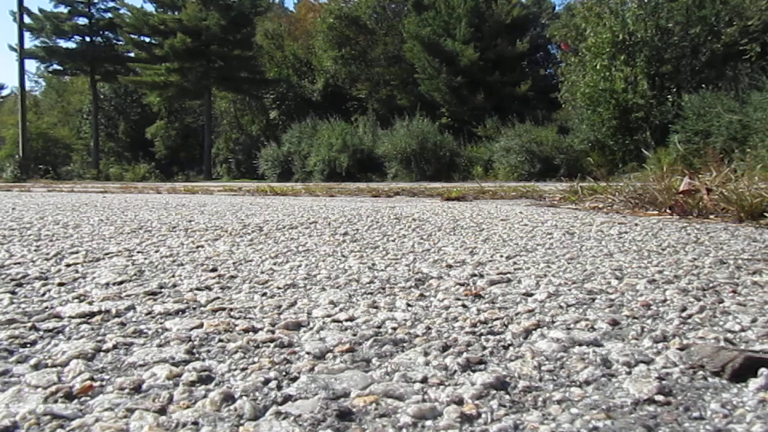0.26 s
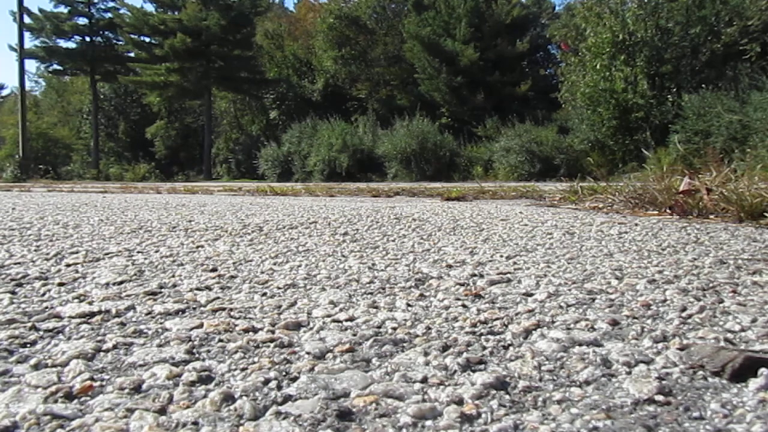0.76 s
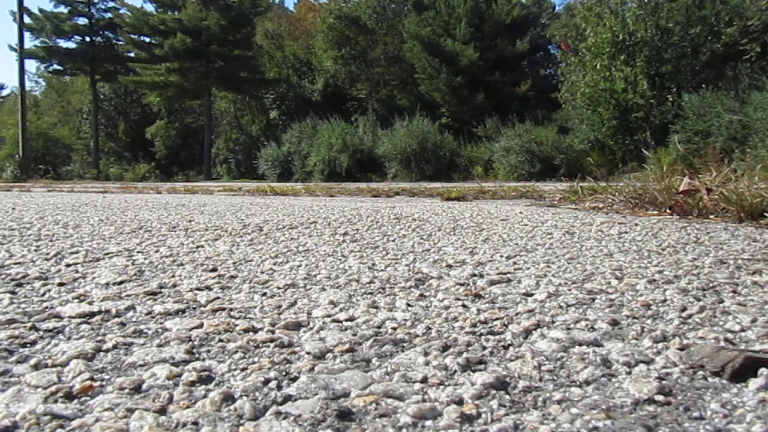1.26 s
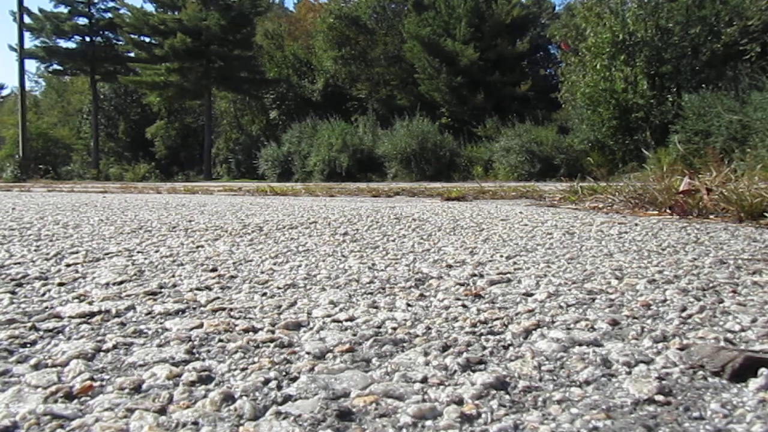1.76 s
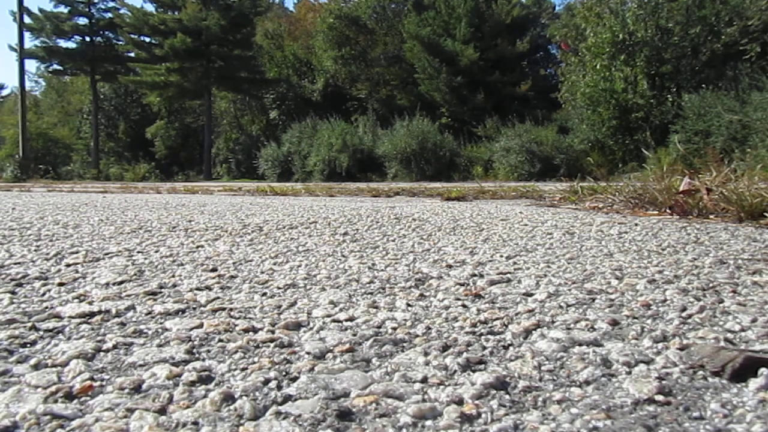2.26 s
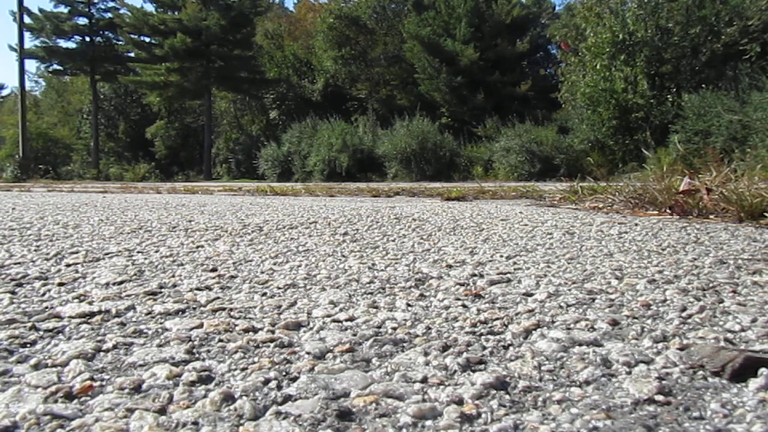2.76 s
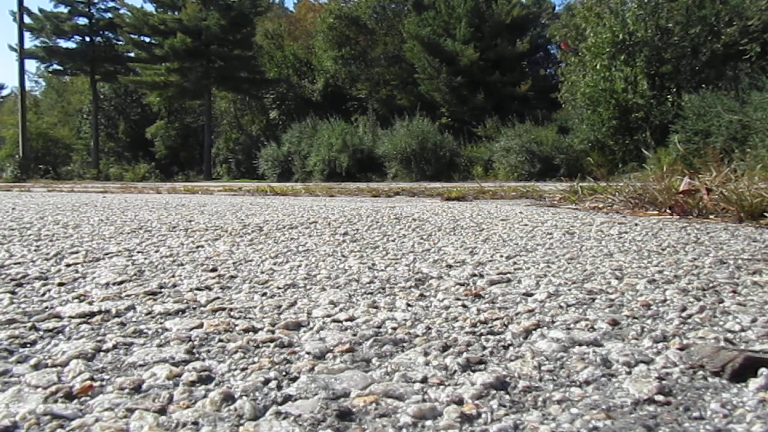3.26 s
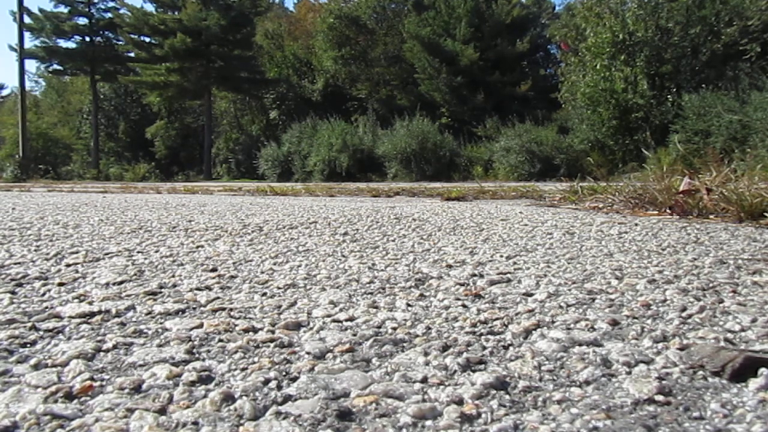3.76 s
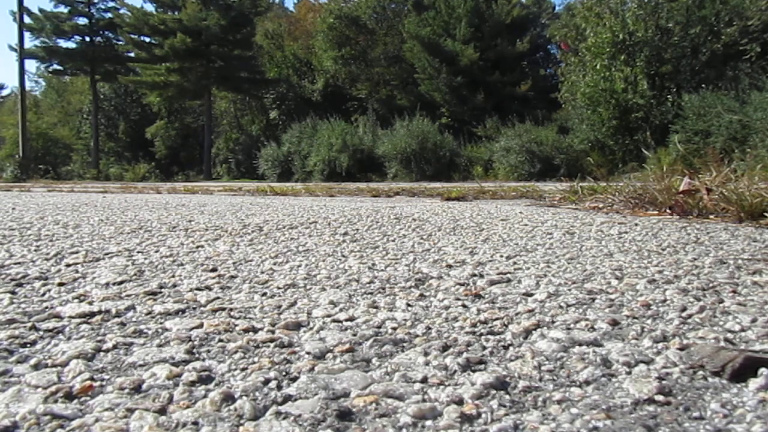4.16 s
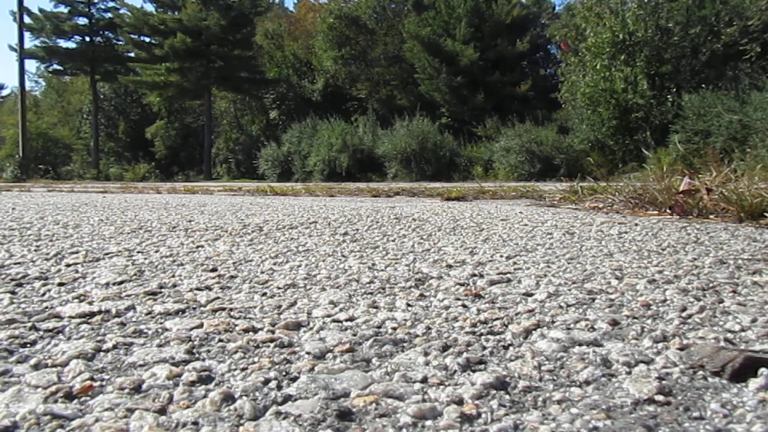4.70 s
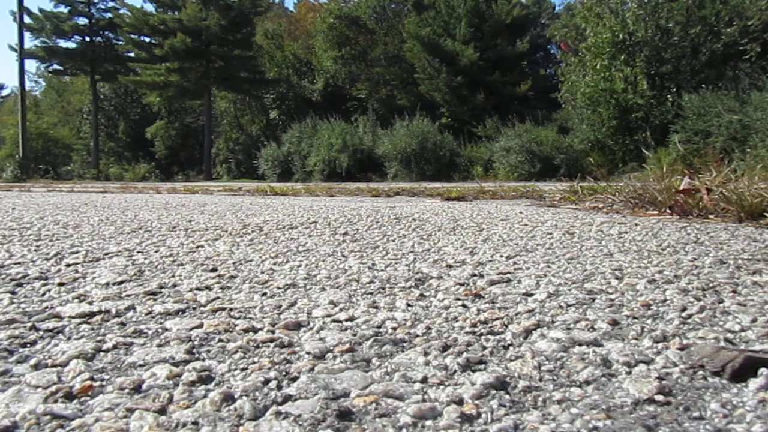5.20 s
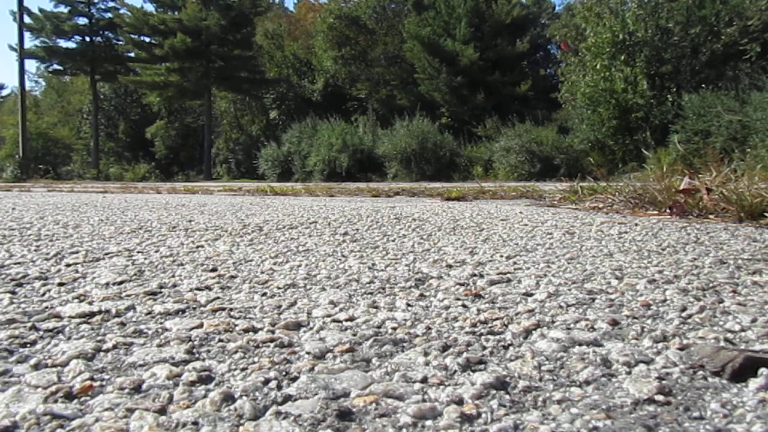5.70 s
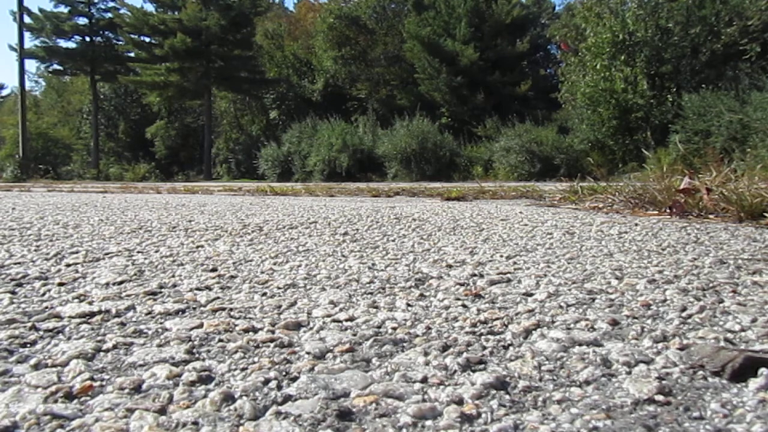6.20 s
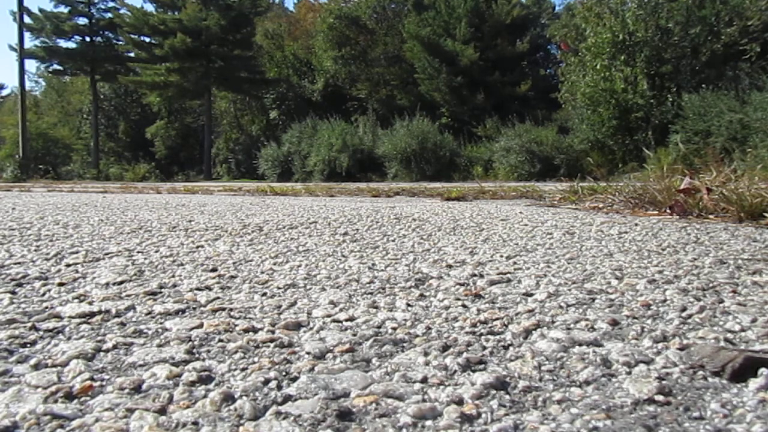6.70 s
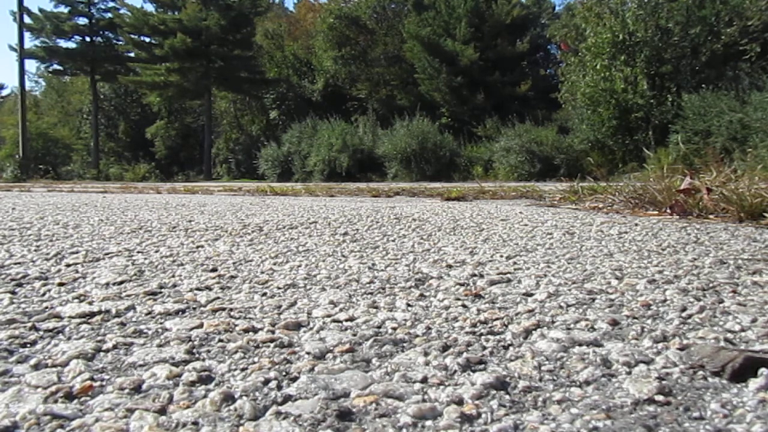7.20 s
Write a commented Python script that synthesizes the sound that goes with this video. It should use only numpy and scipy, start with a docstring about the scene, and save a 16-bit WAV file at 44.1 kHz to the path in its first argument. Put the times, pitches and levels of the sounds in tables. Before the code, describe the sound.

On a quiet road among trees, a raspy car exhaust rises briefly and then winds down in pitch. The car rolls past the microphone from left to right, swelling as its tyres crack and scatter loose stones on coarse asphalt. Then it crawls with a soft, low throb while grit ticks and snaps. Low wind buffets and three light metallic clacks follow, with faint insects behind.

```python
"""A loud car rolls past and slows

A four-cylinder car revs up, lifts off and rolls to a crawl, left to right, past a microphone on coarse
asphalt. Its firings sound through the exhaust pipe: a buzzing note when fast, a throb at idle. Tyres
roar and crunch loose stones, the radiator fan hums and metal clacks under the car. Insects sing in the
trees and a breeze puffs on the microphone."""
import sys
import numpy as np
from scipy import signal
from scipy.io import wavfile
from scipy.ndimage import uniform_filter1d

SR = 44100
rng = np.random.default_rng(int(sys.argv[2]) if len(sys.argv) > 2 else 0)


def dump(signal):
    """Clip the signal to [-1, 1] and save it as 16-bit WAV at the path in sys.argv[1]."""
    limited = np.clip(np.atleast_2d(signal).T, -1, 1)
    pcm = np.round(limited * 32767).astype(np.int16)
    wavfile.write(sys.argv[1], SR, pcm)


N = 328545
T = np.arange(N) / SR
FLUTTER_DB, FLUTTER_PER_S = 3.3, 50  # roughness of the exhaust tones: how deep, how fast


def gain_of(db):
    """Turns decibels into a factor to multiply by."""
    return 10 ** (np.asarray(db) / 20)


def evened(x):
    """Scales a signal so its average strength (rms) is 1."""
    return x / np.sqrt(np.mean(x ** 2) + 1e-20)


def levelled(x, size=11025):
    """Holds the strength near 1, smoothing out swells longer than size samples."""
    return x / np.sqrt(abs(uniform_filter1d(x ** 2, size=size)) + 1e-20)


def bump(at_s, width_s):
    """A smooth hill in time that reaches 1 at at_s."""
    return np.exp(-((T - at_s) / width_s) ** 2)


def read(points, hz):
    """Looks up a table by pitch, on a scale of octaves."""
    pitches, values = np.transpose(points)
    return np.interp(np.log(hz + 1), np.log(pitches + 1), values)


def follow(rows, t=T):
    """Looks up a table by time, giving one curve for each value column."""
    times, *columns = np.transpose(rows)
    return [np.interp(t, times, column) for column in columns]


def colour(x, points, size=8192):
    """Filters a sound by a table of pitch_hz, gain_db; it rings only after a click, never before."""
    log_gain = np.log(gain_of(read(points, abs(np.fft.fftfreq(size, 1 / SR)))))
    taps = np.fft.ifft(np.exp(log_gain - 1j * signal.hilbert(log_gain).imag)).real[:size // 2]
    return signal.oaconvolve(x, taps)[:len(x)]


def resonate(x, hz, width):
    """Makes a sound ring around one pitch; a smaller width (Hz) rings longer."""
    decay = np.exp(-np.pi * width / SR)
    return 2 * signal.lfilter([1 - decay], [1, -decay * np.exp(2j * np.pi * hz / SR)], x).real


def narrow(x, hz, width):
    """Rings a sound twice over, leaving a thin band."""
    return resonate(resonate(x, hz, width), hz, width)


def wander(per_s):
    """A smooth random drift of strength 1; a higher per_s moves faster."""
    decay = np.exp(-np.pi * per_s * 128 / SR)
    slow = signal.lfilter([1], [1, -2 * decay, decay ** 2], rng.standard_normal(N // 128 + 2))
    return np.interp(np.arange(N) / 128, np.arange(len(slow)), evened(slow))


def hiss(points, patchy_db):
    """Noise shaped by a table of pitch_hz, level_db, with drifting louder and softer patches."""
    real, imag, patches = rng.standard_normal((N // 256 + 5, 513, 3)).T
    patches = evened(uniform_filter1d(uniform_filter1d(patches, size=10, axis=0), size=12, axis=1))
    level_db = read(points, np.fft.rfftfreq(1024, 1 / SR))[:, None] + patchy_db * patches
    spectrum = (real + 1j * imag) * gain_of(level_db)
    return evened(signal.istft(spectrum, nperseg=1024, noverlap=768)[1][:N])


def pulses(count, spread_db, jitter=0):
    """A click of random size at each whole count; jitter shifts it by a share of the gap."""
    at = np.interp(np.arange(1, int(count[-1])), count, np.arange(N))
    size, shift = rng.standard_normal((len(at), 2)).T
    at = np.clip(at + jitter * shift * np.gradient(at), 0, N - 2)
    out, sample = np.zeros(N), at.astype(int)
    np.add.at(out, sample, gain_of(size * spread_db) * (1 - at % 1))  # shared by two samples
    np.add.at(out, sample + 1, gain_of(size * spread_db) * (at % 1))
    return out


def echoes(x, t60, level_db):
    """Adds reflections from ground, car floor and tree trunks, fading 60 dB in t60 seconds."""
    taps, at = np.zeros(8000), np.arange(150, 7900, 60)
    bounces = rng.choice([-1., 1.], len(at)) * gain_of(-60 * at / SR / t60)
    taps[at + rng.integers(0, 60, len(at))] = bounces
    return x + gain_of(level_db) * signal.oaconvolve(x, taps / np.linalg.norm(taps))[:N]


def exhaust_wave(multiple, firings, throttle):
    """One exhaust tone, timed so the sum has sharp peaks under load and suction dips off the throttle."""
    sweep, offset = .04 + .16 * throttle, .5 - .4 * throttle
    uneven_lag = .25 * (round(4 * multiple) % 2)  # odd quarter multiples come a quarter wave late
    return np.cos(2 * np.pi * (multiple * firings + sweep * multiple ** 2 + offset - uneven_lag))


def exhaust_tones(firings, rate):
    """The engine note: tones at the firing rate and its multiples, louder with the throttle open."""
    # Tones 1 to 5: level_db, open_throttle_db, build_up_share, passing_db
    harmonics = [(-18.5, 7.5, 1, 3), (-31, 9.5, 0.94, 3.5), (-33, 14, -0.087, 8.5), (-41.5, 8, .3, -0.5),
                 (-39.5, 9, 0.018, -7)]
    # How the pipe passes a tone: pitch_hz, gain_db
    pipe_gain = [(35, -36), (48, -11.5), (64, -6), (90, -4.5), (130, 0.5), (162, -5), (190, -10.5),
                 (205, -8), (225, -2), (265, 3), (320, -5), (390, -6), (500, -7), (600, -6.5), (700, -9),
                 (1050, -9)]
    lift_s, shut_s = .44, .03
    throttle = .5 - .5 * np.tanh((T - lift_s) / shut_s)
    build_db = -19 * np.exp(-T / .088)
    fade_db = -5 * np.maximum(T - 2.11, 0)
    passing = bump(at_s=2.47, width_s=.45)
    roughness_db = FLUTTER_DB * np.maximum(throttle, 1 - passing)
    out = np.zeros(N)
    for multiple, (db, open_db, share, pass_db) in enumerate(harmonics, 1):
        hz = multiple * rate
        level_db = db + open_db * throttle + share * build_db + pass_db * passing + fade_db
        # The pipe's dip near 197 Hz fills in as the tail swings towards the microphone.
        pipe_db = read(pipe_gain, hz) + 9.5 * passing * np.exp(-((hz - 197) / 28) ** 2)
        waver_db = 1.6 * wander(per_s=9) + roughness_db * wander(FLUTTER_PER_S)
        if multiple == 1:
            level_db -= 14 * bump(at_s=.565, width_s=.06)  # drops out as the throttle shuts
        else:
            level_db += waver_db
        out += np.sqrt(2) * gain_of(level_db + pipe_db) * exhaust_wave(multiple, firings, throttle)
    return out


def rasp(firings):
    """Fast firing clicks ring the tail box; one odd cylinder makes a pattern every fourth firing."""
    # Tone of the tail box: pitch_hz, gain_db
    box_tone = [(300, -36.5), (560, 7), (680, 11), (770, 9.5), (930, 2.5), (1200, -1), (1300, -4.5),
                (1375, 2.5), (1450, -14), (1600, -20), (1800, -10), (2050, -20), (2500, -17), (4000, -44),
                (7000, -92)]
    # Loudness of the rasp: time_s, level_db
    loudness = [(0, -26.5), (.33, -30.5), (.46, -27.5), (.65, -37.5), (.8, -30.5), (1.05, -45), (1.27, -38),
                (1.5, -41), (1.9, -33), (2.2, -41), (3.2, -77)]
    every_fourth = pulses(firings / 4, spread_db=.3)
    even = pulses(firings, spread_db=.4) + .75 * pulses(firings / 2, spread_db=.4)
    return gain_of(follow(loudness)[0]) * levelled(colour(even + 1.3 * every_fourth, box_tone))


def burble(firings):
    """Uneven cylinders add in-between tones, which join one by one while the throttle is open."""
    # The in-between tones: multiple_of_firing_rate, level_db
    tones = [(.75, -28), (1.25, -22), (1.5, -27.5), (1.75, -30), (2.25, -28.5), (2.75, -39)]
    t, out, end_s = T[:SR], np.zeros(N), .525
    shut_db = -16.5 * (.5 + .5 * np.tanh((t - end_s) / .048)) - 40 * np.maximum(t - end_s, 0)
    for multiple, db in tones:
        join_s = .073 + .052 * multiple
        joined = .5 + .5 * np.tanh((t - join_s) / .097)
        flutter_db = .5 * FLUTTER_DB * wander(FLUTTER_PER_S)[:SR]
        level = np.sqrt(2) * joined * gain_of(db + shut_db + flutter_db)
        out[:SR] += level * exhaust_wave(multiple, firings[:SR], throttle=.97)
    return out


def engine_whines(firings, rate):
    """Thin, wavering high tones follow the engine and swell where they cross the tail box's ring."""
    # The high tones: multiple_of_firing_rate, level_db
    tones = [(2.5, -42), (4.5, -44), (5.5, -46), (6, -42), (6.5, -39.5), (7, -47), (7.5, -44), (8, -45),
             (9, -38), (9.5, -54), (10, -44), (10.5, -46), (11, -49), (12, -50), (13, -52)]
    # Pitches the exhaust favours: pitch_hz, gain_db
    body = [(200, 4), (450, 0), (700, -5), (950, -8), (1250, -4), (1380, 8), (1480, -2), (1800, -6),
            (2150, 4), (2400, -5), (2800, -8)]
    # Rise and fall of all the whines: time_s, gain_db
    swell = [(0, -14), (.3, -8), (.45, 1), (.65, -3), (.9, -2), (1.25, 3), (1.6, -1), (2, -12), (2.3, -50)]
    n, out = round(swell[-1][0] * SR), np.zeros(N)
    for multiple, db in tones:
        waver_db = 2.6 * wander(per_s=5.5)[:n]
        level_db = db + read(body, multiple * rate[:n]) + waver_db + follow(swell, T[:n])[0]
        tone = np.sin(2 * np.pi * (multiple * firings[:n] + rng.random()))
        out[:n] += np.sqrt(2) * gain_of(level_db) * tone
    return out


def nearness():
    """One when the car is closest, falling towards zero before and after."""
    return bump(at_s=2.62, width_s=2.02)


def road(firings):
    """Tyres roar, the tread hisses and the car body rumbles; each firing shakes the roar and rumble."""
    # Loudness of the rolling car: time_s, roar_db, rumble_db
    loudness = [(0, -31, -23), (.2, -28.5, -33.5), (.62, -30.5, -33), (.9, -30.5, -29), (1.51, -27, -33),
                (2.01, -24.5, -23.5), (2.4, -28.5, -29.5), (2.68, -26.5, -25), (2.84, -33, -34),
                (3.3, -37.5, -34.5), (4.3, -39.5, -37.5), (5.15, -38.5, -38), (5.27, -42.5, -44.5),
                (5.5, -42, -43), (6.02, -39, -38), (6.3, -37.5, -41.5), (6.41, -39, -44), (6.45, -41, -50),
                (6.9, -38, -46.5), (7.45, -38, -40)]
    # Tone of the tyre roar, body rumble and tread hiss, each: pitch_hz, level_db
    roar_tone = [(240, -45), (400, 0.5), (670, 0.5), (850, 1), (1100, -1), (1300, -0.5), (1500, -4),
                 (1950, -4), (2600, -10.5), (3200, -15), (3900, -28), (5000, -32.5), (8000, -92)]
    rumble_tone = [(25, -42), (50, -37), (75, -17.5), (120, 6.5), (200, 7), (320, 4.5), (450, -9),
                   (700, -17), (2000, -89)]
    tread_tone = [(2500, 3.5), (3900, -6.5), (4800, -1.5), (6000, -2), (7500, -6), (9000, -9.5),
                  (10300, -18), (11500, -49), (13000, -60)]
    roar_db, rumble_db = follow(loudness)
    shake_db = 2 * (np.exp(-(firings % 1) / .034) - .3)
    roar = gain_of(roar_db + shake_db) * hiss(roar_tone, patchy_db=1.5)
    blur_per_s, puff_share = 70, .2  # faster firings blur together; a puff's share of the gap
    distinct = np.clip(1 - np.gradient(firings) * SR / blur_per_s, 0, 1)
    puff_db = 7 * distinct * (np.exp(-(firings % 1) / puff_share) - puff_share)
    rumble = colour(hiss(rumble_tone, patchy_db=1.5), [(30, -18.5), (90, -1)])
    tread = gain_of(roar_db - 16 + 8 * nearness()) * hiss(tread_tone, patchy_db=1.5)
    return roar + gain_of(rumble_db + puff_db) * rumble + tread


def trees():
    """The background: a soft hush of air and a steady insect whine."""
    # Tone of the air: pitch_hz, level_db
    air_tone = [(180, -57.5), (400, -2), (600, 5), (900, 4), (1200, 5), (1850, -4), (3200, -30),
                (4000, -30), (5000, -10.5), (8000, -31.5), (10000, -39), (12500, -58)]
    # Bands of the insect whine: pitch_hz, width_hz, level_db
    insects = [(8450, 110, -71.5), (8080, 770, -69)]
    air = gain_of(-51) * np.array([hiss(air_tone, patchy_db=4), hiss(air_tone, patchy_db=3)])
    noise = rng.standard_normal((2, N))
    return air + sum(gain_of(db) * evened(narrow(noise, hz, width)) for hz, width, db in insects)


def tail_box():
    """Flowing gas keeps the box at the end of the exhaust ringing at one pitch."""
    # Loudness of the ring: time_s, level_db
    loudness = [(.25, -60), (.4, -39), (.65, -41), (.8, -48), (1.2, -46), (1.35, -38), (1.7, -38),
                (1.85, -48), (2.1, -70)]
    ring = narrow(rng.standard_normal(N), hz=1370, width=22)
    return gain_of(follow(loudness)[0]) * levelled(ring)


def thumps(firings):
    """Each firing sends a low thump down the pipe; at idle they are heard as a throb."""
    # Tone of one firing after the pipe: pitch_hz, gain_db
    pipe_tone = [(14, -60), (25, -11), (45, 9.5), (70, 12.5), (130, 9), (200, -4), (280, -3), (400, -9.5),
                 (600, -4.5), (800, -40), (1100, -10.5), (1400, -27), (1800, -50), (3000, -63), (6000, -99)]
    # Loudness of the thumps: time_s, level_db
    loudness = [(0, -66), (.8, -50), (1.6, -42), (1.9, -38), (2.3, -33), (2.5, -34), (2.7, -37), (2.9, -68),
                (3.1, -47), (3.75, -43.5), (4.6, -40.5), (5.15, -34.5), (5.27, -45), (5.5, -43.5),
                (5.8, -37), (6.15, -38), (6.25, -40), (6.41, -41), (6.47, -70), (6.8, -69), (6.95, -45),
                (7.45, -39.5)]
    clicks = pulses(firings, spread_db=2.2, jitter=.017)
    throb = -echoes(colour(clicks, pipe_tone), t60=.09, level_db=-11)
    return gain_of(follow(loudness)[0]) * levelled(throb)


def crack(noise):
    """Shapes noise into the broad crack of a stone under a tyre."""
    # Tone of the crack: pitch_hz, gain_db
    crack_tone = [(300, -26.5), (600, 4), (1000, 4), (2000, 0.5), (3000, -3), (3900, -12.5), (5000, -27),
                  (8000, -63)]
    return evened(colour(noise, crack_tone))


def stones():
    """Tyres crunch stones in short, ringing bursts and scatter grit in a rain of tiny ticks; the same bursts
    give the metal clacks near 6.2 s their noisy body."""
    # Crunched stones, and near 6.15-6.4 s the broad noisy body of the metal clacks: start_s, level_db,
    # ring_pitch_hz, ring_above_crack_db, treble_db
    crunches = [(1.779, -23, 565, 3, -38), (1.932, -19.5, 840, -4, -26), (1.964, -23.5, 824, 8, -44),
                (2.146, -17, 710, -5, -25), (2.164, -16, 975, -2, -27), (2.326, -21, 823, -5, -28),
                (2.508, -15.5, 590, -10, -28), (2.526, -13.5, 920, -6, -27), (2.553, -14.5, 960, -4, -35),
                (2.633, -21, 1610, -5, -46), (2.674, -18, 1210, -17, -35), (2.7, -20.5, 2635, -1.5, -42),
                (2.759, -20.5, 1340, -10, -31.5), (2.805, -24, 872, -2, -52), (2.839, -28, 890, -13, -43),
                (3.068, -52, 670, -4, -45), (3.098, -59, 670, 0, -53), (3.167, -58, 729, 0, -35.5),
                (3.202, -39, 1340, -2, -40), (3.247, -36, 780, -13, -44), (3.665, -36, 2040, 4, -44),
                (3.77, -33, 960, -14, -43), (3.945, -43, 1500, -6, -58), (4.372, -33, 2050, 0, -55),
                (4.385, -43, 3600, 1, -54), (4.789, -41, 810, 10, -47), (5.324, -45, 1217, 10, -51),
                (6.155, -33, 1700, -6, -52), (6.207, -34, 1210, 4.5, -52), (6.387, -30, 1295, -3, -39),
                (6.4, -32, 1500, -4, -66), (6.999, -44, 940, 11, -65)]
    # Tone of the treble of crunches and grit: pitch_hz, gain_db
    spray_tone = [(2500, -2), (3900, -10), (5000, -1.5), (7500, -6), (9500, -11), (10500, -18),
                  (11500, -52), (14000, -75.5)]
    rise_s, decay_s, pure_share = .005, .019, .46
    body, treble, t = np.zeros(N), np.zeros(N), np.arange(6000) / SR
    shape = (1 - np.exp(-t / rise_s)) * np.exp(-(t / decay_s) ** 1.04)
    for start_s, db, hz, ring_db, treble_db in crunches:
        burst = rng.standard_normal(len(t))
        rough_ring = evened(resonate(burst, hz, width=.032 * hz))
        ring = (1 - pure_share) * rough_ring + pure_share * np.sqrt(2) * np.sin(2 * np.pi * hz * t)
        at = round(start_s * SR)
        body[at:at + len(t)] += gain_of(db) * shape * (gain_of(ring_db) * ring + crack(burst))
        treble[at:at + len(t)] += gain_of(treble_db) * shape
    ticks_per_s, tick_s = 270, .0035
    sizes = gain_of(2.8 * np.minimum(rng.exponential(1, N), 4))
    ticks = sizes * (rng.random(N) < ticks_per_s / SR)
    grit = signal.lfilter([1], [1, -np.exp(-1 / (tick_s * SR))], ticks)
    treble += gain_of(-70 + 25 * nearness()) * evened(grit)
    return body + treble * evened(colour(rng.standard_normal(N), spray_tone))


def knocks():
    """Stones hit the car floor; each hollow knock is a few waves of one tone."""
    # The hits: time_s, peak_db, pitch_hz
    hits = [(1.941, -19, 850), (1.972, -12, 870), (2.165, -19, 660), (2.176, -18, 690), (2.178, -18, 960),
            (2.21, -21, 960), (2.333, -22, 830), (2.514, -18, 570), (2.525, -17, 600), (2.526, -18, 950),
            (2.534, -19, 800), (2.545, -13, 990), (2.559, -16, 760), (2.565, -12, 985)]
    return sum(gain_of(db) * bump(at_s, width_s=.0055) * np.sin(2 * np.pi * hz * (T - at_s))
               for at_s, db, hz in hits)


def top_hiss():
    """A thin, patchy, very high hiss just after the car passes, different left and right."""
    # Tone of the hiss: pitch_hz, level_db
    tone = [(9500, -62), (10500, 3), (12000, -2), (13500, -6.5), (14500, -14)]
    # Loudness of the hiss: time_s, level_db
    loudness = [(2.35, -90), (2.56, -76), (2.6, -58), (2.9, -65), (3.15, -59), (3.34, -66), (3.4, -85),
                (3.8, -100)]
    return gain_of(follow(loudness)[0]) * np.array([hiss(tone, patchy_db=5), hiss(tone, patchy_db=1)])


def snaps():
    """Small stones snap dryly: a few milliseconds of noise, each with its own bright pitch."""
    # The snapping stones: start_s, strength_db, pitch_hz
    pebbles = [(3.322, -36, 7070), (3.4115, -44, 5780), (3.4722, -33, 6050), (3.63, -32, 6500),
               (3.708, -32, 6420), (3.7364, -33, 5950), (3.8457, -45, 5670), (3.8944, -51, 6000),
               (3.9559, -36, 6320), (4.035, -33, 6020), (4.0924, -40, 6150), (4.121, -34, 6490),
               (4.2517, -38, 5740), (4.326, -36, 5760), (4.3944, -42, 7210), (4.4314, -44, 5640),
               (4.606, -38, 5490), (4.7616, -43, 5540), (4.9621, -41, 5230), (5.0843, -38, 4730),
               (5.1104, -40, 4810), (5.2114, -42, 4760), (5.325, -37, 4440), (5.9494, -48, 5080)]
    rise_s, decay_s = .0015, .005
    out, t = np.zeros(N), np.arange(1500) / SR
    shape = (1 - np.exp(-t / rise_s)) * np.exp(-t / decay_s)
    for start_s, db, hz in pebbles:
        burst = rng.standard_normal(len(t))
        sound = evened(resonate(burst, hz, width=.15 * hz)) + 2.5 * crack(burst)
        out[round(start_s * SR):][:len(t)] += gain_of(db - 6) * sound * shape
    return out


def fan():
    """The radiator fan hums with a few tones that waver slightly together."""
    # Tones of the hum: pitch_hz, level_db
    tones = [(172.3, -51), (258.4, -52), (339.1, -53)]
    # The hum comes and goes: time_s, gain_db
    swell = [(3.3, -47), (3.8, 1), (6.3, 2), (6.5, -26)]
    speed = 1 + .00393 * evened(resonate(rng.standard_normal(N), hz=0, width=2.1))
    hum = sum(gain_of(db) * np.sin(2 * np.pi * hz * np.cumsum(speed) / SR) for hz, db in tones)
    return np.sqrt(2) * gain_of(follow(swell)[0]) * hum


def wind():
    """A lumpy breeze and stronger puffs push the microphone's two openings in opposite directions."""
    # Tone of the wind: pitch_hz, gain_db
    tone = [(15, -45), (28, -5), (50, -21), (125, -8), (220, -17.5), (300, -14.5), (650, -37), (1500, -93)]
    # The strongest puffs: time_s, strength_db
    gusts = [(5.24, -26), (5.39, -36), (5.653, -34), (5.83, -30), (6.006, -31), (6.08, -25), (6.228, -24),
             (6.4, -27), (6.71, -45), (7.164, -44), (7.35, -39)]
    # Strength of the breeze: time_s, level_db
    loudness = [(4.9, -47), (5.2, -40), (5.5, -47), (5.8, -45), (6.05, -40), (6.42, -41), (6.55, -55),
                (6.9, -64), (7.45, -52)]
    flow = colour(rng.standard_normal(N), tone)
    surges = sum(gain_of(db) * bump(at_s, width_s=.024) for at_s, db in gusts)
    puffs = colour(surges * levelled(flow, size=1200), [(20, -24), (45, 12), (400, -12), (900, -35)])
    breeze = gain_of(follow(loudness)[0] + .5 * wander(per_s=34)) * evened(flow)
    return (puffs + breeze) * np.array([[.9], [-1.1]])


def clacks():
    """Blows ring the same metal part under the car, each landing a little differently."""
    # The blows: start_s, level_db, brightness_db_per_octave
    blows = [(6.153, -45, -12), (6.208, -41, -4), (6.3827, -41.5, 10)]
    # Ringing tones of the metal: pitch_hz, level_db, ring_s (time to fade 60 dB)
    metal = [(1200, -11, .05), (1700, 8, 0.039), (2560, -2, 0.06), (3320, 12, 0.036), (4420, -3, 0.046),
             (4500, -4, 0.058), (5050, -6, 0.037), (6850, -9.5, 0.08), (7420, -9, 0.049)]
    # Tone of the blow's dry snap: pitch_hz, gain_db
    snap_tone = [(400, -25), (1000, 0), (2000, 2), (4000, 0), (7000, -7), (9000, -13.5), (11000, -30)]
    rise_s, snap_s = .004, .012
    out, t = np.zeros(N), np.arange(4000) / SR
    for start_s, db, brightness in blows:
        phases, chance_db = rng.random(len(metal)), 3 * rng.standard_normal(len(metal))
        ring = np.zeros(len(t))
        for (hz, tone_db, ring_s), phase, luck_db in zip(metal, phases, chance_db):
            level_db = tone_db + luck_db + brightness * np.log2(hz / 3400) - 60 * t / ring_s
            ring += gain_of(level_db) * np.sin(2 * np.pi * (hz * t + phase))
        snap = gain_of(9) * evened(colour(rng.standard_normal(len(t)), snap_tone)) * np.exp(-t / snap_s)
        rattle = 1 + .4 * evened(uniform_filter1d(rng.standard_normal(len(t)), size=40))
        clack = (ring * rattle + snap) * (1 - np.exp(-t / rise_s))
        out[round(start_s * SR):][:len(t)] += gain_of(db) * clack
    return out


def rising_dip(hz, t):
    """Decibels to take away: twice near the end the bass drops out and the dip slides up in pitch."""
    first_s, second_s, onset_s, climb_s = 6.49, 6.74, .039, .46
    from_hz, climb_hz = 89, 514
    since = t - np.where(t < second_s, first_s, second_s)
    centre_hz = from_hz + climb_hz * (1 - np.exp(-np.maximum(since, 0) / climb_s))
    depth_db = (33 - 9 * np.log2(centre_hz / from_hz)) * np.clip(1 + since / onset_s, 0, 1)
    return depth_db * np.exp(-(np.log2((hz[:, None] + 15) / centre_hz) / .99) ** 2)


def cricket():
    """A cricket chirps unevenly in two thin bands, over a faint steady trill in the upper one."""
    # Bands of the song: pitch_hz, width_hz
    bands = [(4330, 90), (4600, 90)]
    # The chirps: time_s, length_s, lower_band_db, upper_band_db
    chirps = [(6.58, .03, -72, -66), (6.705, .03, -62, -61), (6.814, 0.027, -70, -59),
              (6.85, .025, -69, -62), (6.885, .02, -66, -63), (6.978, .03, -63, -67),
              (7.05, .035, -65, -62), (7.135, .025, -60, -63), (7.193, .02, -72, -64),
              (7.24, .035, -72, -65), (7.305, .03, -63, -61), (7.365, .025, -69, -65),
              (7.43, .03, -66, -70)]
    song, trill_from_s = np.zeros(N), 6.6
    for band, (hz, width) in enumerate(bands):
        tone = levelled(narrow(rng.standard_normal(N), hz, width), size=600)
        song += tone * sum(gain_of(db[band]) * bump(at_s, length_s / 2) for at_s, length_s, *db in chirps)
    return song + gain_of(-73) * np.clip((T - trill_from_s) * 10, 0, 1) * tone


def placed(car):
    """Puts the car in stereo, with the rising dip: the nearer microphone opening hears it first."""
    # How late the left side hears the car: time_s, lag_samples
    left_lag = [(0, -1.7), (2.2, -1.65), (2.7, -.4), (3.1, .55), (3.6, 1.3), (4.2, 1.55), (7.45, 1.6)]
    # How strongly each pitch leans to the car's side: pitch_hz, factor
    lean = [(60, .1), (250, .25), (500, .5), (1000, .9), (3000, 1.1), (4000, 1), (5200, .4), (8000, 0),
            (9500, -.4)]
    # Steady lean to the left: pitch_hz, left_minus_right_db
    tilt = [(60, -1.7), (130, -1.1), (250, -.3), (500, .4), (1000, .2), (3000, 0), (4000, .5), (8000, .3)]
    # Steady head start of the left side: pitch_hz, lead_radians
    left_lead = [(40, .1), (130, .17), (300, .2), (600, .12), (1200, .03), (2500, .06)]
    # Scattered sound, unlike on the two sides: pitch_hz, level_against_car_db
    scatter = [(40, -26), (200, -25), (500, -17), (1000, -15), (2500, -15), (4000, -12), (7000, -10),
               (12000, -8)]
    hz, t, spectrum = signal.stft(car, SR, nperseg=1024, noverlap=768)
    spectrum = spectrum * gain_of(-rising_dip(hz, t))
    hz, lag = hz[:, None], follow(left_lag, t)[0]
    pan_db = -1.62 * lag * read(lean, hz) + read(tilt, hz)
    lead = read(left_lead, hz) - 2 * np.pi * hz * lag / SR
    half = gain_of(pan_db / 2) * np.exp(.5j * lead)  # each side takes half, in opposite directions
    real, imag = rng.standard_normal((len(t), len(hz), 2)).T
    stray = gain_of(read(scatter, hz)) * abs(spectrum) * (real + 1j * imag) / np.sqrt(2)
    sides = np.array([spectrum * half + stray, spectrum / half - stray])
    return signal.istft(sides, SR, nperseg=1024, noverlap=768)[1][:, :N]


def scene():
    """The car on the road, insects in the trees and wind on the microphone."""
    # Engine speed: time_s, firings_per_s
    engine_speed = [(0, 182.5), (.25, 193.6), (.46, 205.5), (.5, 204.8), (.72, 188.9), (.89, 180.5),
                    (1.14, 162.1), (1.53, 129.6), (1.82, 108), (2.14, 85.8), (2.45, 63.4), (2.63, 49.2),
                    (2.88, 41.8), (3.3, 30.2), (3.7, 26.1), (4.3, 23.8), (4.9, 23.6), (5.5, 20.5),
                    (6.1, 22.3), (6.5, 21.5), (6.91, 23.8), (7.45, 29.2)]
    rate = follow(engine_speed)[0]
    firings = np.cumsum(rate) / SR  # how many firings so far
    exhaust = exhaust_tones(firings, rate) + thumps(firings) + rasp(firings) + burble(firings)
    exhaust += engine_whines(firings, rate) + tail_box()
    car = exhaust + road(firings) + stones() + knocks() + snaps() + clacks() + fan()
    return placed(car) + top_hiss() + trees() + cricket() + wind()


def record(dry):
    """Cuts away the very highest treble."""
    edge_hz = 14300
    taps = signal.firwin(511, edge_hz, window=("kaiser", 9), fs=SR)
    return signal.oaconvolve(dry, taps[None], "same")


dry = scene()
out = record(dry)
dump(out)
```